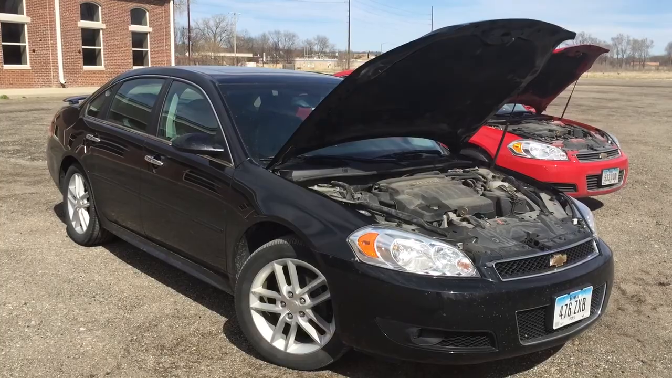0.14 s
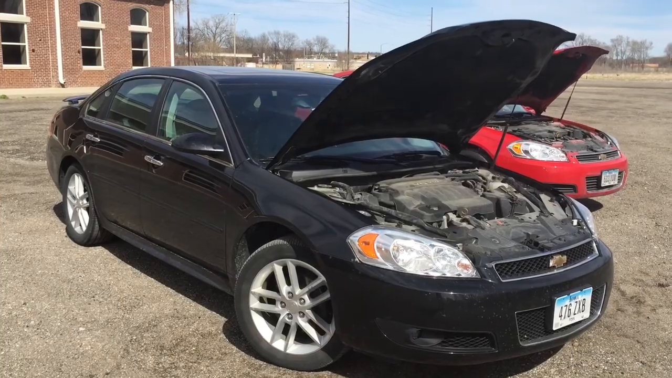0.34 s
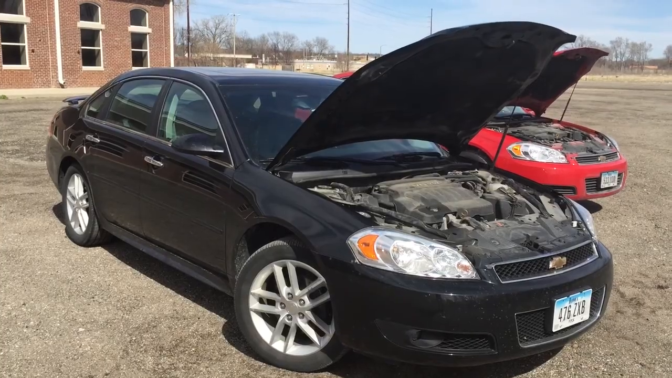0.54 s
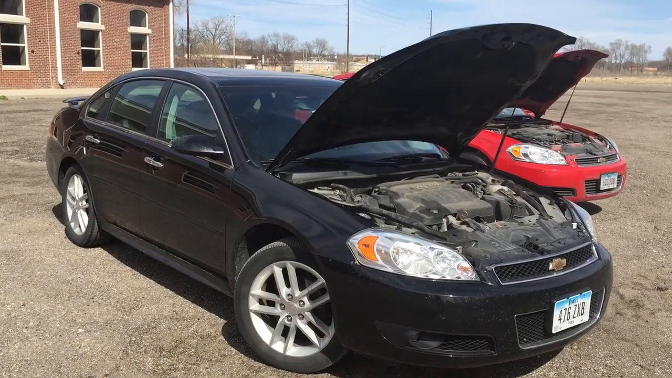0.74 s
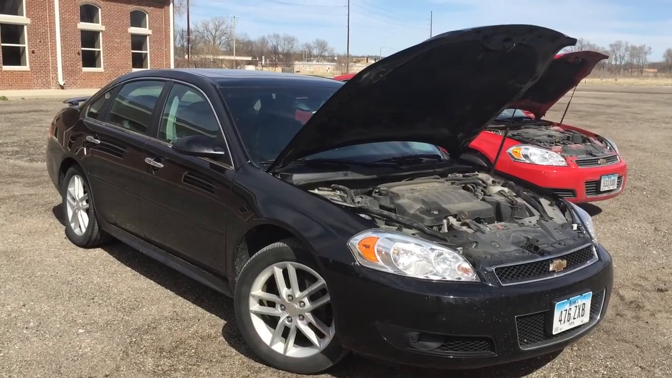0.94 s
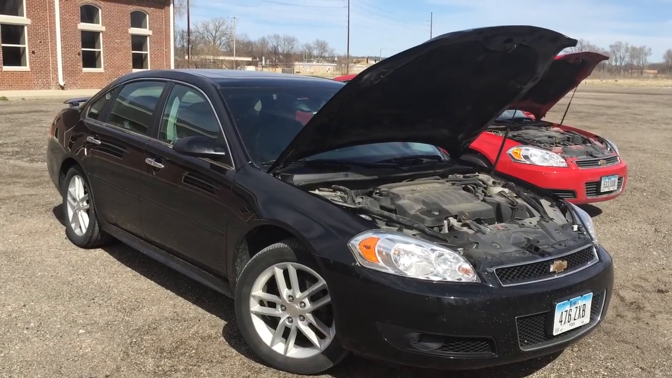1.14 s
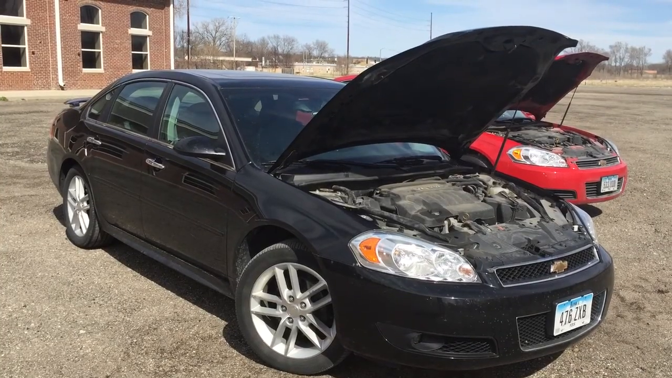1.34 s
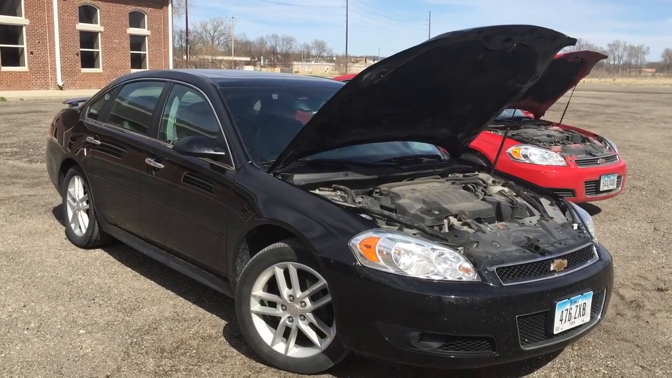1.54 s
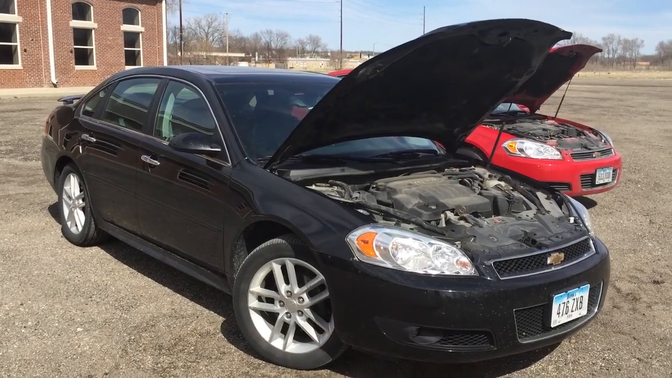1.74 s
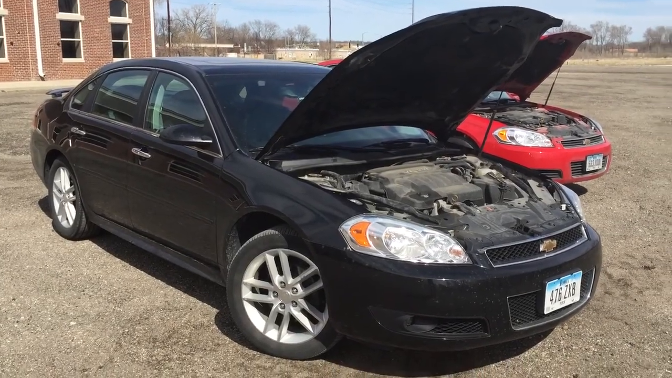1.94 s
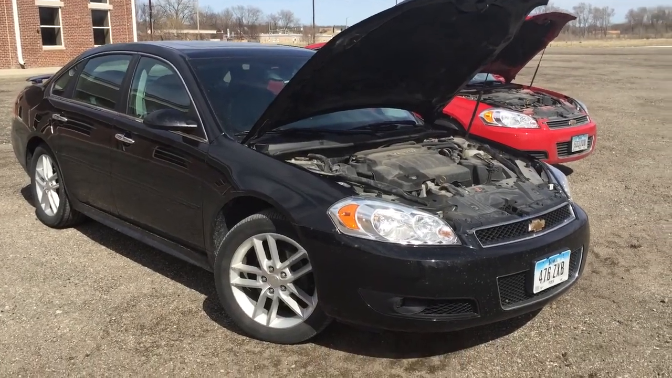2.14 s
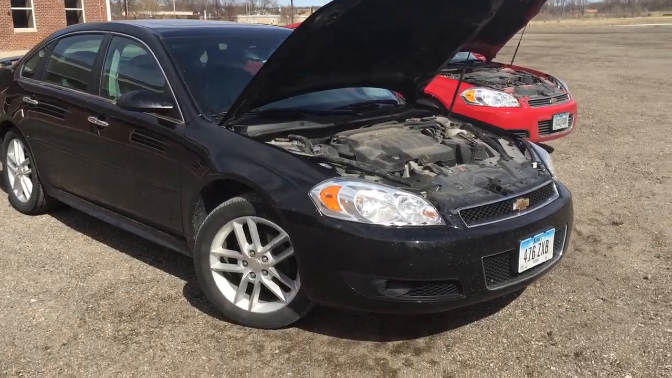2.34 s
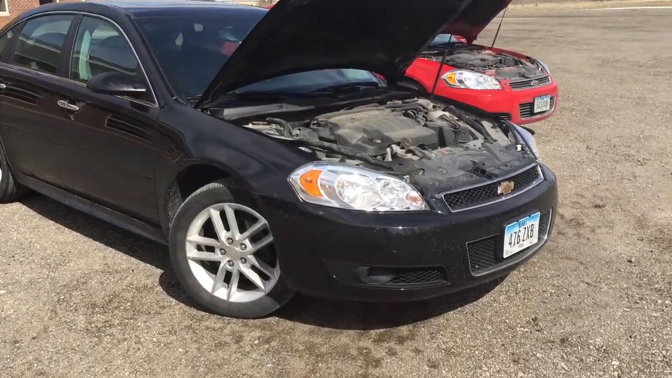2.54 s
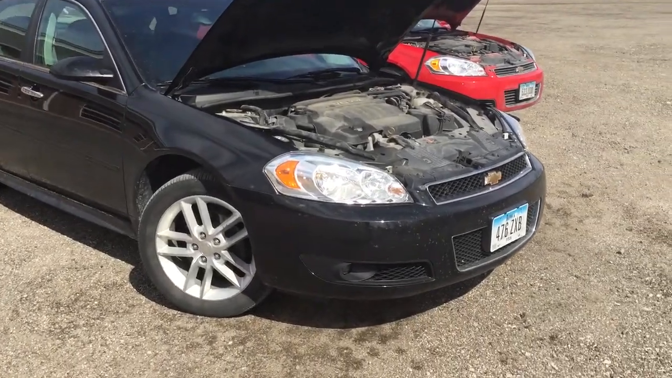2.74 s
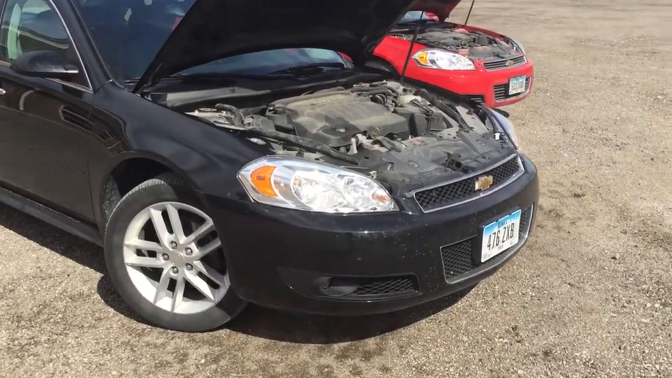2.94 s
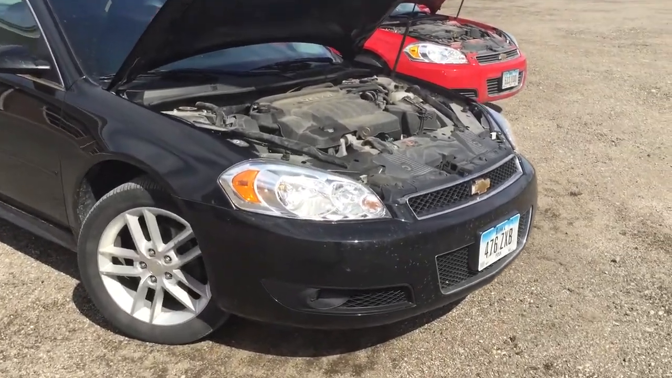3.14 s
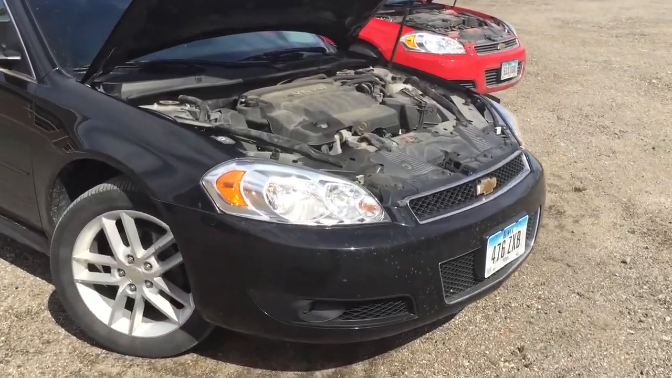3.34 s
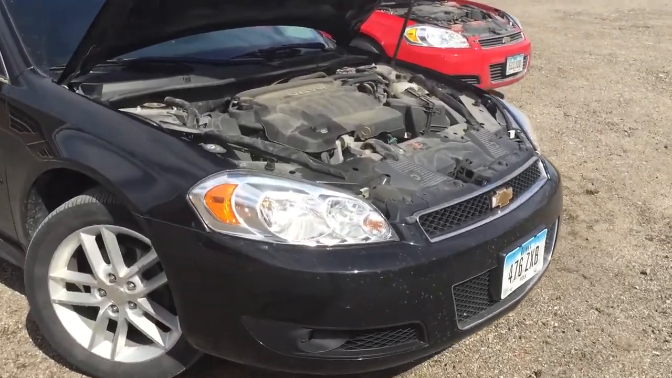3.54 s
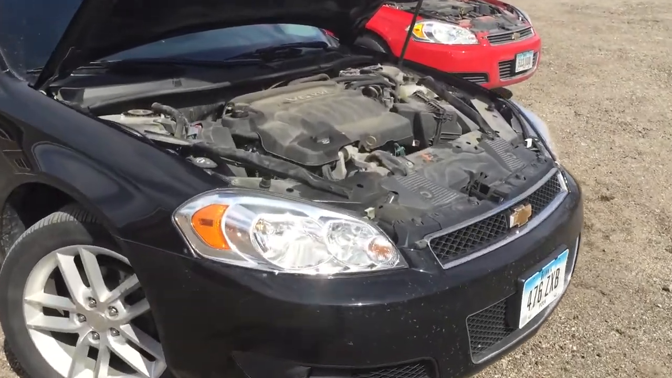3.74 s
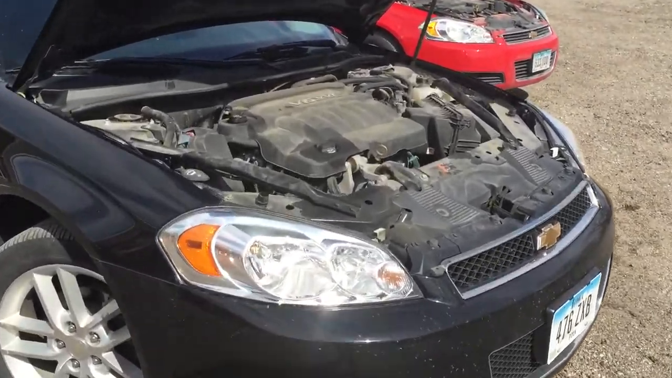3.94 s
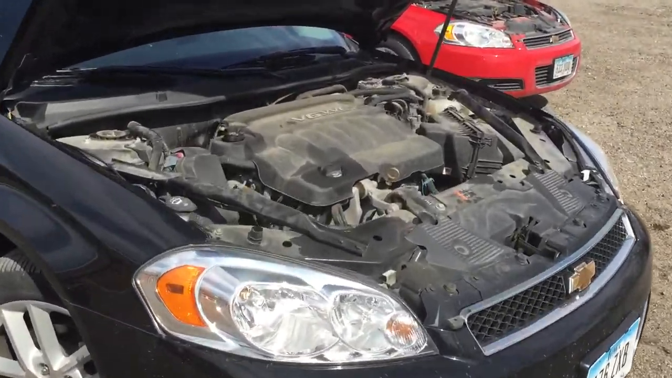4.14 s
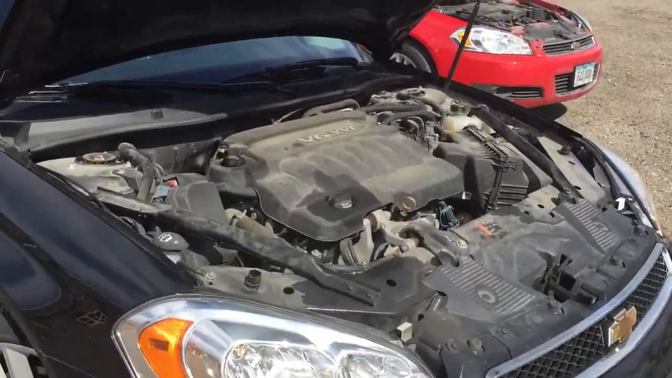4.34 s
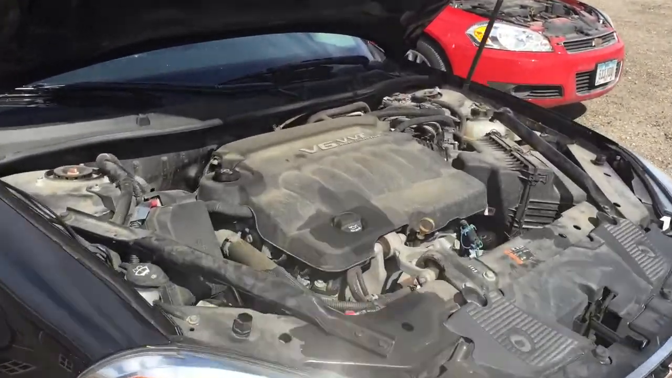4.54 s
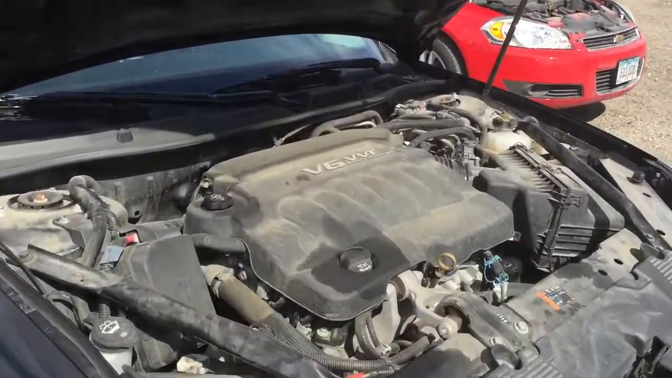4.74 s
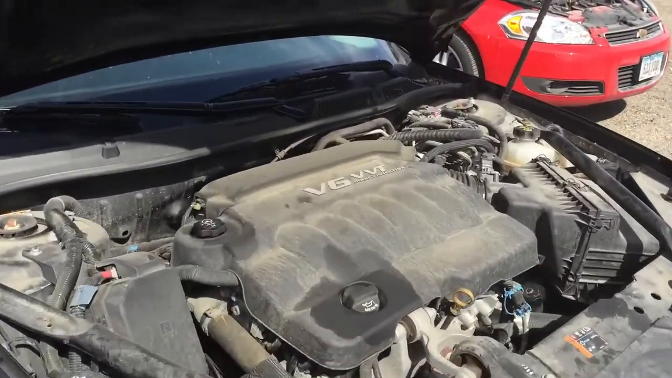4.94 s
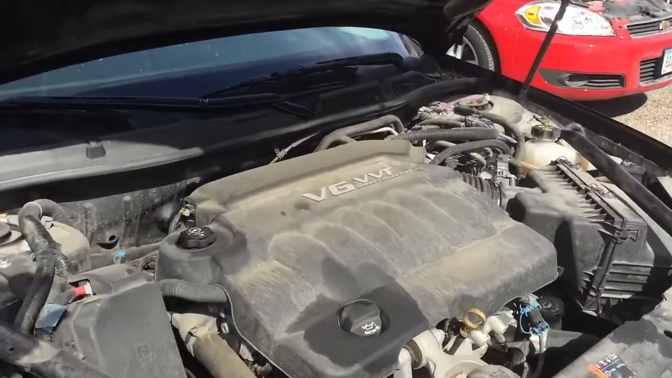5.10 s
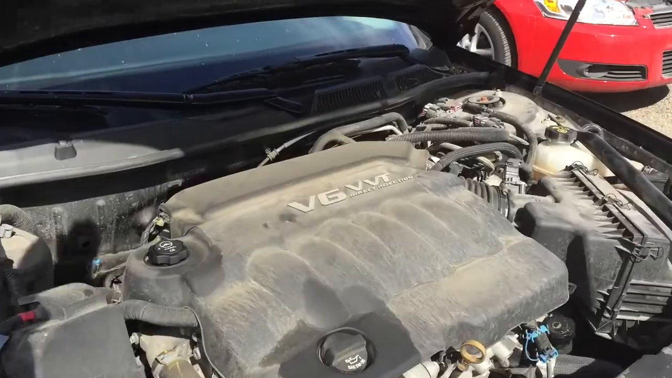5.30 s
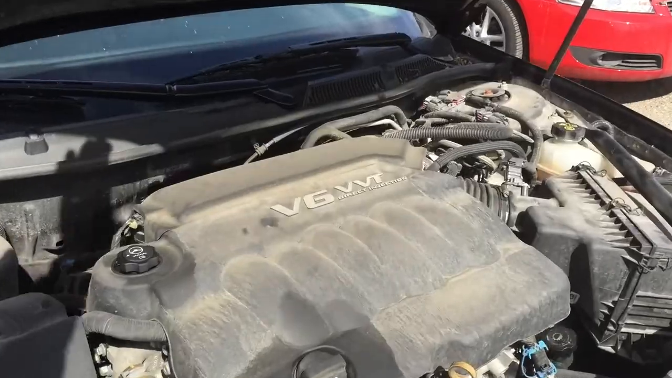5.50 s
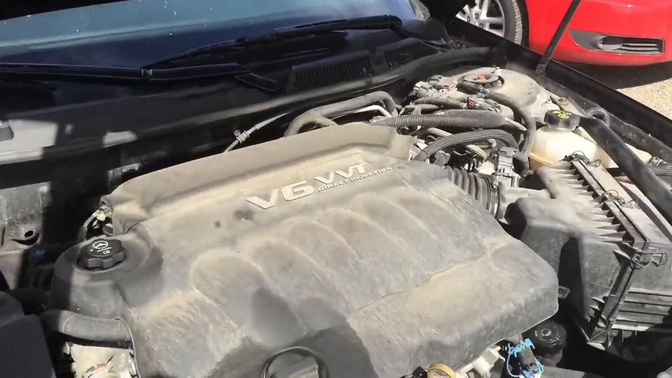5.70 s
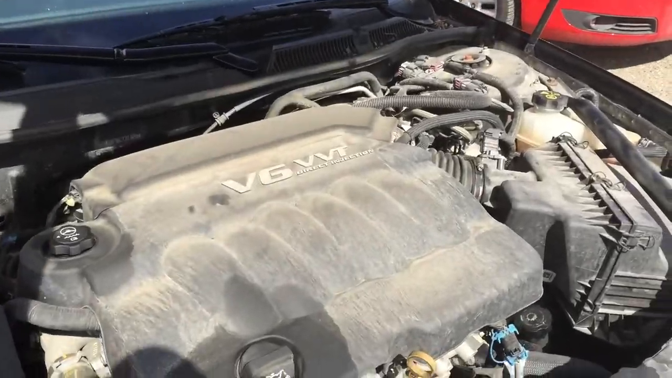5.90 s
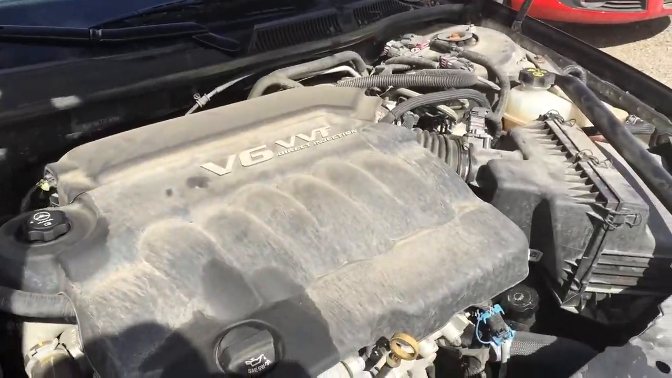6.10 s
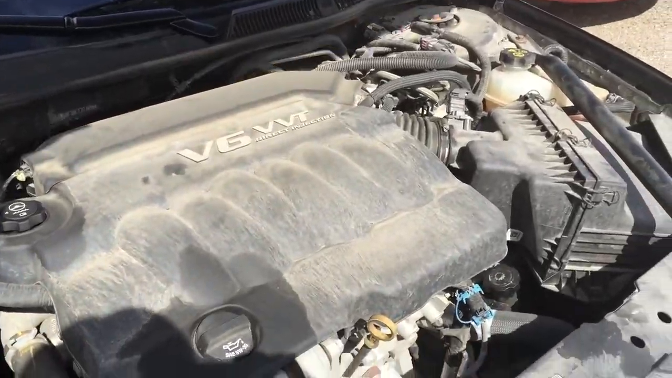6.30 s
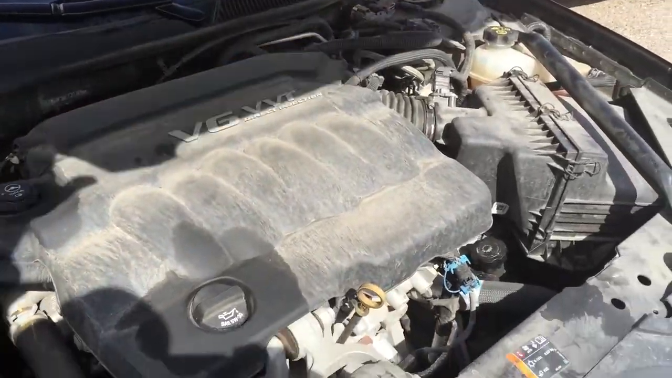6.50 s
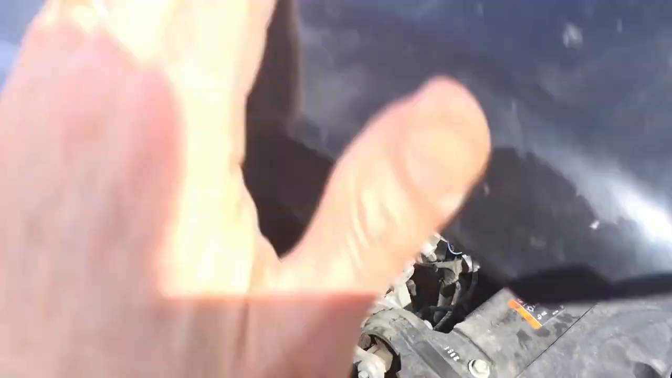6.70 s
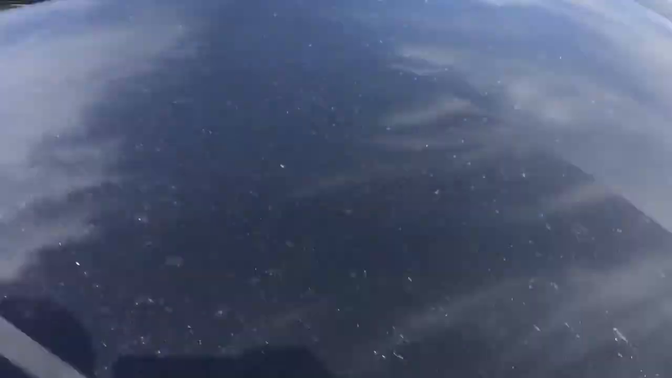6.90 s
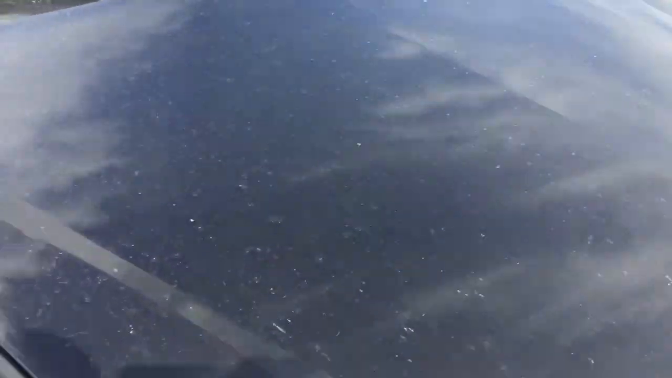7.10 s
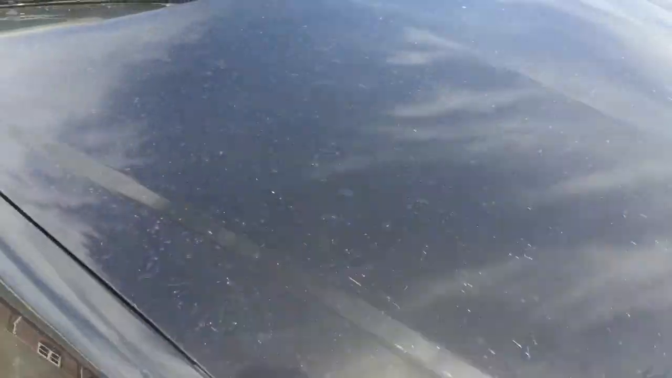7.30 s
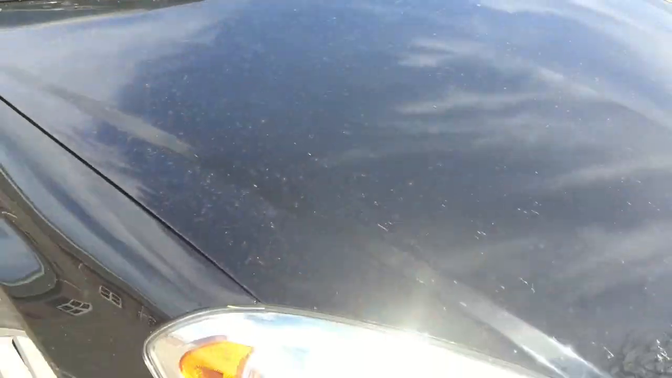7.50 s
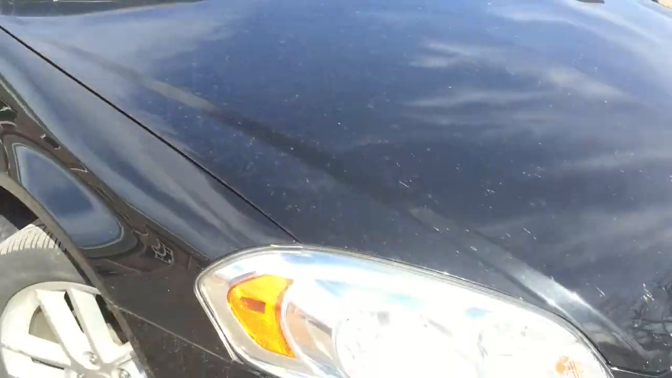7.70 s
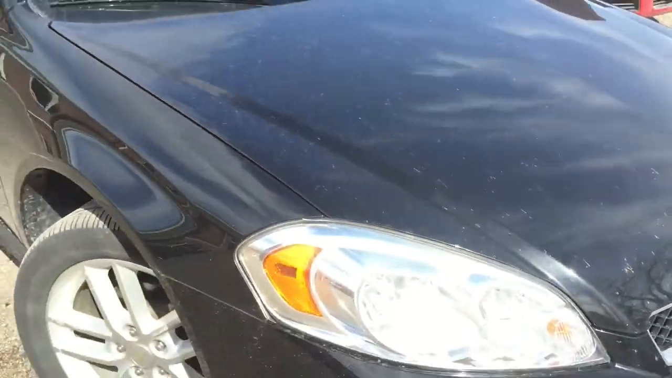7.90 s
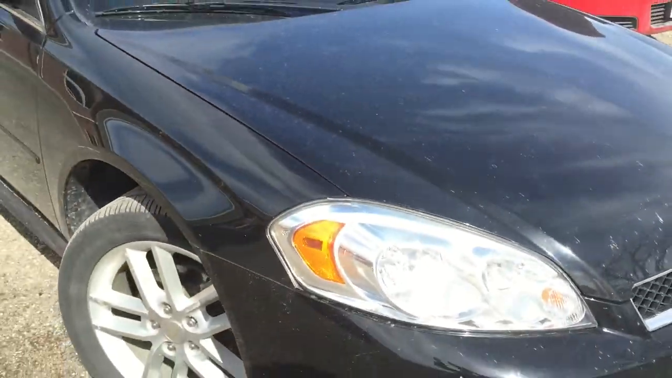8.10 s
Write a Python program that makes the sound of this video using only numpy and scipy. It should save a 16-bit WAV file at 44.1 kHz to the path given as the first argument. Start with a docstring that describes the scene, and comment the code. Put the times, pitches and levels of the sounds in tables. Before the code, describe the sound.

Outdoors, a car idles with its hood open, giving a softly pulsing hiss of belts and valves. It grows louder and brighter as a hand-held microphone approaches. Wind rumbles on the microphone, a low hum comes and goes, and a few small taps sound nearby. Late on, the latch clacks, and a second later the hood slams with a loud metallic crash, leaving the engine muffled under the gusts.

```python
"""A gusty lot, a hand-held microphone walking up to a car that idles with its hood open.
The belts and valve gear hiss through the engine bay, louder and brighter close up. Wind buffets
the microphone, a low hum comes and goes, and a few small taps sound close by. The latch clacks,
then the hood is slammed: its sheet metal crashes, overloads the recorder, echoes off a nearby
building and muffles the engine."""
import sys
import numpy as np
from scipy import signal
from scipy.io import wavfile
from scipy.ndimage import uniform_filter1d

SR = 44100
rng = np.random.default_rng(int(sys.argv[2]) if len(sys.argv) > 2 else 0)


def generate_wav(signal):
    """Clip the signal to [-1, 1] and save it as 16-bit WAV at the path in sys.argv[1]."""
    frames = np.transpose(np.atleast_2d(signal))
    scaled = np.clip(frames, -1, 1) * 32767
    pcm = np.round(scaled).astype(np.int16)
    wavfile.write(sys.argv[1], SR, pcm)


N = 359415


def amp(db):
    return 10 ** (np.asarray(db) / 20)


def unit_rms(x):
    return x / np.sqrt(np.mean(x ** 2) + 1e-20)


def at_hz(points, hz):
    """A curve of (freq_hz, value) points, read along a log frequency axis."""
    freq_hz, value = np.transpose(points)
    return np.interp(np.log(hz + 1), np.log(freq_hz + 1), value)


def follow(curves, t):
    """The columns of a list of (time_s, ...) curves at the times t."""
    time_s, *columns = np.concatenate(curves).T
    return [np.interp(t, time_s, column) for column in columns]


def add(mix, start_s, sound):
    part = mix[round(start_s * SR):][:len(sound)]
    part += sound[:len(part)]


def bandpass(x, band_hz):
    return signal.lfilter(*signal.butter(2, band_hz, "band", fs=SR), x)


def grid(size):
    """Bin frequencies and frame times of short-time spectra at 75% overlap."""
    return np.fft.rfftfreq(size, 1 / SR)[:, None], np.arange(4 * N // size + 5) * size / 4 / SR


def shaped_noise(db, hz, lo_hz, hi_hz):
    """Noise whose spectra follow db (bins x frames), at constant power between lo_hz and hi_hz."""
    gain = amp(db)
    gain = gain / np.sqrt((gain ** 2 * (hz > lo_hz) * (hz < hi_hz)).sum(0))
    real, imag = rng.standard_normal((db.shape[1], len(hz), 2)).T
    size = 2 * len(hz) - 2
    return signal.istft((real + 1j * imag) * gain, nperseg=size, noverlap=3 * size // 4)[1][:N]


# The walk up to the car: time_s, level_db, nearness (0 far or shut and dull, 1 close and bright)
ENGINE_APPROACH = [
    [(0, -42, 0.045), (2.8, -41.5, 0.22), (3.4, -40.5, 0.45), (4.5, -36, 0.55), (5.4, -32, 0.84),
     (5.7, -34, 0.88), (5.9, -32, 0.8), (6.1, -33, 0.76), (6.4, -31.5, 0.67), (6.73, -31.5, 0.82),
     (6.93, -40.5, .3), (7.02, -43.5, 0.26), (7.25, -56, .1), (7.45, -54.5, 0.086), (7.8, -50, 0.3),
     (8.15, -42.5, .27)],
]
# The engine's spectrum from across the lot and from over the open bay: freq_hz, density_db
FAR_SPECTRUM = [(210, -43), (350, -13), (488, -9.5), (628, -1.5), (747, -11), (875, -9.5), (1010, -13),
                (1720, -2.5), (2400, -7), (2900, -2), (3800, -14.5), (4310, -18), (6200, -44),
                (15200, -46.5)]
NEAR_SPECTRUM = [(210, -33.5), (350, -8), (423, -25), (553, -8.5), (735, -13.5), (1000, -9), (1320, -13.5),
                 (1650, -6.5), (2050, -7), (2350, -3), (2750, -0.5), (3150, -4), (3680, -18.5),
                 (4380, -14.5), (4890, -23), (15200, -57.5)]
# Bay resonances and dips, then narrow belt and pump whines: freq_hz, width_hz, lift_db (at nearness 0)
BAY_RESONANCES = [(570, 310, 0), (876, 22, 6.5), (1370, 28, 5.5), (1742, 100, 2), (1920, 60, 5),
                  (2253, 76, 5), (2680, 70, 1), (3010, 180, -0.5), (4250, 110, 7), (4880, 160, -6.5),
                  (5330, 180, 6), (5880, 150, 9), (6500, 570, 10.5), (10300, 310, -5), (14000, 1200, 4.5)]
BELT_WHINES = [(670, 8.3, -3.5), (1290, 16, 4), (1679, 18, 4.5), (1796, 33, 2), (1871, 24, 0),
               (2585, 23, 6), (4210, 36, 5.5)]
VALVE_CYCLE_HZ = 17.2


def engine():
    """Hiss of belts and valve gear through the bay resonances, pulsing with the valve train."""
    hz, frame_s = grid(size=1024)
    _, near = follow(ENGINE_APPROACH, frame_s)
    lift_db = sum(db / (1 + (2 * (hz - centre) / width) ** 2)
                  for centre, width, db in BAY_RESONANCES + BELT_WHINES)
    lift_db = lift_db * (1 - 0.78 * near)  # close up, many sources blur the resonances
    patches = rng.standard_normal((len(frame_s), len(hz))).T
    patches = uniform_filter1d(uniform_filter1d(patches, size=5, axis=0), size=12, axis=1)
    flicker_db = 1.5 * unit_rms(patches)
    spectrum_db = (1 - near) * at_hz(FAR_SPECTRUM, hz) + near * at_hz(NEAR_SPECTRUM, hz)
    hiss = shaped_noise(spectrum_db + lift_db + flicker_db, hz, lo_hz=1200, hi_hz=4000)
    t = np.arange(N) / SR
    wander = unit_rms(uniform_filter1d(rng.standard_normal(N), size=8000))
    phase = (VALVE_CYCLE_HZ * t + 0.055 * wander) % 1
    strong_valve = 0.5 * np.exp(-phase / 0.38)
    six_cylinders = 0.18 * np.exp(-(6 * phase % 1) / 0.3)
    pulse = uniform_filter1d(uniform_filter1d(1.3 + strong_valve + six_cylinders, size=60), size=60)
    level_db, _ = follow(ENGINE_APPROACH, t)
    return amp(level_db) * hiss * unit_rms(pulse)


# Gusts across the microphone port: start_s, length_s, level_db, change_db, pitch_hz, gap_ms
GUST_TRAINS = [(0.418, 0.17, -36, 6, 102, 43), (3.03, .12, -27, -8, 95, 25.4),
               (5.148, 0.058, -28, 0, 87.5, 24), (5.516, 0.19, -10.5, -7, 124.6, 21.6),
               (5.96, .05, -14, 0, 127, 16), (6.065, 0.067, -27, 0, 142, 19),
               (6.336, 0.258, -25, -4, 120, 28), (7.446, .1, -25.5, 2, 125, 35),
               (7.76, .075, -13.5, -4.5, 110, 15.8), (7.9, 0.28, -25.5, 5.5, 159, 37)]
EDDY_TURNS = 1.5  # typical swings in one eddy
GAP_SPREAD, PITCH_SPREAD, TURNS_SPREAD, SIZE_SPREAD_DB = 0.3, 0.25, 0.34, 1
SAG_PER_DB = 0.04  # a fading gust sheds slower eddies


def gust_eddies(start_s, length_s, level_db, change_db, pitch_hz, gap_ms):
    """The eddies one gust sheds: uneven gaps, sizes and pitches, pushing or pulling first."""
    gap, pitch, turns, size, push = np.clip(rng.standard_normal((16, 5)), -2, 2).T
    since_s = np.cumsum(gap_ms / 1000 * np.exp(GAP_SPREAD * gap))
    since_s = since_s - since_s[0]
    progress = since_s / length_s
    hz = pitch_hz * np.exp(PITCH_SPREAD * pitch + SAG_PER_DB * change_db * np.minimum(progress, 1))
    db = level_db + change_db * progress + SIZE_SPREAD_DB * size
    width_ms = 1000 * EDDY_TURNS * np.exp(TURNS_SPREAD * turns) / hz
    rows = np.transpose([start_s + since_s, db, hz, width_ms, np.sign(push)])
    return list(rows[since_s < length_s])


# Wind right on the microphone: time_s, level_db, tilt_db_per_octave
WIND_STRENGTH = [
    [(0, -42.5, -4.5), (.23, -45.5, -4), (.92, -48.5, -3), (1.27, -48.5, 0), (1.68, -43.5, -6),
     (1.88, -48, -5), (2.29, -50, -0.5), (2.77, -49.5, -4.5), (2.93, -41.5, -4), (3.25, -51.5, -1),
     (3.62, -45.5, -3.5), (3.72, -49, -1.5), (4.91, -49, 1), (5.55, -39, -3), (5.77, -44, -2.5),
     (6.08, -39.5, -4.5), (6.47, -40.5, 0), (6.82, -49, 2.5), (6.92, -34.5, -2.5), (7.02, -43.5, 3.5),
     (7.38, -37.5, 4.5), (7.51, -34, 2.5), (7.69, -34, 1.5), (7.79, -30, 2.5), (8.15, -30.5, 1)],
]
# Its buffeting before the tilt: freq_hz, density_db
BUFFET_SPECTRUM = [(12, -44), (20, -16), (50, 5), (107, 1), (173, -4.5), (224, -7), (305, -11.5),
                   (476, -27.5), (809, -34), (1200, -45), (1560, -70.5), (2640, -120)]
# Lone eddies bursting on the port: centre_s, level_db, pitch_hz, width_ms
LONE_EDDIES = [(.04, -26.5, 100, 6.6), (.816, -31, 83, 15), (.982, -43, 75, 27), (1.036, -38.5, 102, 28),
               (1.21, -34, 129, 9.7), (1.757, -25.5, 97, 10), (3.003, -20, 80, 18), (3.48, -35, 100, 3.6),
               (3.632, -26.5, 101, 15), (3.695, -34, 82, 28), (4.164, -37, 94, 17), (5.026, -34, 81, 28),
               (5.315, -26.5, 118, 14), (5.8, -31, 79.5, 22), (5.904, -25, 82, 28),
               (6.207, -24.5, 187, 8.8), (6.805, -31.5, 84, 30), (6.905, -32, 102, 7),
               (6.973, -23.5, 103, 26), (7.298, -25.5, 170, 15), (7.359, -21, 139, 18),
               (7.427, -19.5, 174, 8.2), (7.87, -22, 121, 9), (7.566, -20, 233, 6.5), (7.715, -20, 137, 11),
               (7.74, -12, 131, 3.9)]


def wind():
    """Lumpy low turbulence on the microphone, plus single eddies as short pressure swings."""
    hz, frame_s = grid(size=2048)
    _, tilt_db = follow(WIND_STRENGTH, frame_s)
    octaves = np.log2(np.clip(hz, 20, 1500) / 125)
    rumble = shaped_noise(at_hz(BUFFET_SPECTRUM, hz) + tilt_db * octaves, hz, lo_hz=100, hi_hz=150)
    lumps = unit_rms(uniform_filter1d(uniform_filter1d(rng.standard_normal(N), size=500), size=500))
    level_db, _ = follow(WIND_STRENGTH, np.arange(N) / SR)
    out = amp(level_db) * rumble * unit_rms(amp(2.74 * lumps))
    eddies = [(*eddy, 1) for eddy in LONE_EDDIES]
    eddies += [eddy for gust in GUST_TRAINS for eddy in gust_eddies(*gust)]
    for centre_s, db, pitch_hz, width_ms, sign in eddies:
        t = np.arange(-1.6 * width_ms / 1000, 1.6 * width_ms / 1000, 1 / SR)
        passage = 2 * t / (width_ms / 1000)
        envelope = 2. ** -(passage ** 2)
        turns = pitch_hz * t * (1 - 0.13 * passage)  # the swing slows as it passes
        swing = sum(gain * np.sin(2 * np.pi * multiple * turns)
                    for multiple, gain in [(0.5, 0.28), (1, 1), (2, 0.23), (3, 0.076)])
        local_rumble = rumble[round((centre_s + t[0]) * SR):][:len(t)]
        torn_air = 0.044 * np.resize(local_rumble, len(t)) / rumble.std() * envelope
        add(out, centre_s + t[0], sign * amp(db) * (swing + torn_air) * envelope)
    return out


# Spells of low hum on the way to the car: start_s, end_s, pitch_hz, start_db, end_db
HUM_SPELLS = [(.15, 1.183, 83.65, -42.5, -53), (1.19, 1.781, 84.1, -46.5, -31.5),
              (1.85, 2.932, 83.54, -35.5, -37), (3.77, 4.755, 81.5, -38, -42.5),
              (4.76, 4.964, 82.1, -43, -37)]
# The hum's partials: multiple, gain_db
HUM_PARTIALS = [(1, 1.5), (2, -16.5), (4, -30)]
HUM_FADE_S, HUM_SAG_HZ_PER_S = 0.048, 0.29


def hum():
    """A low tone with weak overtones that comes in spells, sagging a little in pitch."""
    out = np.zeros(N)
    for start_s, end_s, pitch_hz, start_db, end_db in HUM_SPELLS:
        t = np.arange(0, end_s - start_s, 1 / SR)
        turns = np.cumsum(pitch_hz - HUM_SAG_HZ_PER_S * (t - t.mean())) / SR
        tone = sum(amp(db) * np.cos(2 * np.pi * multiple * turns) for multiple, db in HUM_PARTIALS)
        fade = np.minimum(np.minimum(t, t[::-1]) / HUM_FADE_S, 1)
        level_db = start_db + (end_db - start_db) * t / t[-1]
        add(out, start_s, np.sqrt(2) * amp(level_db) * tone * fade)
    return out


# Small taps close to the microphone: start_s, level_db, pitch_hz, t60_s, rustle_db
CLOSE_TAPS = [(2.215, -33, 1740, .014, -41), (3.484, -24, 704, 0.016, -40), (5.148, -30, 1000, 0.016, -35),
              (8.013, -34, 1700, 0.017, -38)]
RUSTLE_BAND_HZ, RUSTLE_T60_S = (700, 3000), 0.15


def taps():
    """Short dull taps that drop at once onto their pitch, each with a brief rustle."""
    out, t = np.zeros(N), np.arange(2000) / SR
    attack = 1 - np.exp(-(t / 0.00033) ** 2)
    for start_s, level_db, pitch_hz, t60_s, rustle_db in CLOSE_TAPS:
        turns = pitch_hz * (t + 0.001 * (1 - np.exp(-t / 0.00066)))
        tap = amp(level_db - 60 * t / t60_s) * np.sin(2 * np.pi * turns)
        hiss = bandpass(bandpass(rng.standard_normal(len(t)), RUSTLE_BAND_HZ), RUSTLE_BAND_HZ)
        rustle = amp(rustle_db - 60 * t / RUSTLE_T60_S) * unit_rms(hiss)
        add(out, start_s, (tap + rustle) * attack)
    return out


def struck_metal(modes, tilt_db, damping):
    """Decaying modes, peak 1; each blow lands elsewhere, and a hard one favours the high modes."""
    hz, db, t60_s = np.transpose(modes)[:, :, None]
    t = np.arange(SR // 3) / SR
    share, detune = rng.standard_normal((2, *hz.shape))
    gain = amp(db + tilt_db * np.log2(hz / 1500) + 2.7 * share - 60 * t * damping / t60_s)
    attack = 1 - np.exp(-(t / 0.00026) ** 2)
    ring = (gain * np.sin(2 * np.pi * hz * (1 + 0.0049 * detune) * t)).sum(0) * attack
    return ring / abs(ring).max()


# The latch's modes, heard from beside the car: pitch_hz, level_db, t60_s (before damping)
LATCH_MODES = [(850, -6.5, 0.18), (1217, -11.5, 0.065), (1324, 0.5, 0.088), (1436, -8.5, 0.065),
               (1604, 3.5, 0.039), (1730, -10, 0.057), (1996, -16.5, 0.04), (2490, -9, 0.091),
               (2586, 6.5, 0.073), (2750, -1.5, 0.14), (2906, -1.5, 0.054), (3240, -17.5, 0.049),
               (3590, -6.5, 0.086), (3820, -20.5, .04), (4540, -22.5, .04), (4660, -15.5, 0.061),
               (5120, -18, 0.04), (5550, -23, 0.069), (6050, -31.5, 0.049)]
# Strikes on the latch: start_s, level_db, chatter_ms, step_db (per bounce)
LATCH_STRIKES = [(6.0516, -7, 10, -9.5), (7.039, 0.5, 18, -6.5)]
CHATTER_GAP_S, CHATTER_STEP_DB, BOUNCE_GAP_GROWTH = 0.0041, -0.1, 1.75
CONTACT_DB, CONTACT_DECAY_S = -21.5, 0.002  # level relative to the strike


def latch():
    """Each strike gives a bright first contact, quick chatter, then four ever slower, softer bounces."""
    out = np.zeros(N)
    contact_decay = np.exp(-np.arange(600) / SR / CONTACT_DECAY_S)
    for start_s, level_db, chatter_ms, step_db in LATCH_STRIKES:
        contact = bandpass(rng.standard_normal(600), band_hz=(2500, 7000)) * contact_decay
        add(out, start_s, amp(level_db + CONTACT_DB) * contact)
        knock = np.arange(int(chatter_ms / 1000 / CHATTER_GAP_S) + 5)
        bounce = np.maximum(knock - knock[-5], 0)
        times_s = start_s - CHATTER_GAP_S + np.cumsum(CHATTER_GAP_S * BOUNCE_GAP_GROWTH ** bounce)
        levels_db = level_db + CHATTER_STEP_DB * knock + step_db * bounce
        for time_s, db in zip(times_s, levels_db):
            add(out, time_s, amp(db) * struck_metal(LATCH_MODES, tilt_db=1.4, damping=1.64))
    return out


# The hood's dense sheet-metal modes at close range: freq_hz, density_db
CRASH_SPECTRUM = [(59, -31.5), (100, -1.5), (640, -10.5), (727, -8.5), (1340, -17.5), (1520, -10),
                  (1660, -20), (2690, -18.5), (3460, -23), (6810, -35), (15500, -50)]
# How long they ring: freq_hz, t60_s
CRASH_DECAY = [(150, 0.24), (500, 0.19), (1500, 0.16), (4000, 0.15), (10000, 0.064)]
SLAM_S, CRASH_DB = 7.039, -6


def hood_crash():
    """The slam sets the whole sheet of metal crashing, and it dies away band by band."""
    hz, frame_s = grid(size=256)
    since_s = np.clip(frame_s - SLAM_S, 0, None)
    free_s = np.clip(since_s - 0.025, 0, None)  # the rattle feeds the crash for a moment
    dying_db = 60 * free_s / at_hz(CRASH_DECAY, hz)
    spreading_db = 20 * np.exp(-(since_s / 0.034) ** 2) * (hz < 700)  # bass needs time to spread
    spectra = (rng.standard_normal((len(frame_s), len(hz), 2)) @ [1, 1j]).T
    spectra = spectra * amp(at_hz(CRASH_SPECTRUM, hz) - dying_db - spreading_db)
    crash = signal.istft(spectra, nperseg=256, noverlap=192)[1][round(SLAM_S * SR):N]
    attack = np.minimum(np.arange(len(crash)) / (0.0026 * SR), 1)
    out = np.zeros(N)
    add(out, SLAM_S, amp(CRASH_DB) * crash / crash[:1000].std() * attack)
    return out


# The hood panel's modes at close range: pitch_hz, level_db, t60_s (before damping)
HOOD_MODES = [(142, -4, 0.26), (199, -6, 0.18), (256, -11, 0.11), (306, 4, 0.15), (361, -6.5, 0.33),
              (406, -7, 0.27), (486, -13, 0.22), (540, -8.5, .18), (710, -3.5, 0.19), (733, 0, 0.21),
              (825, -6.5, .16), (930, -4, 0.21), (1174, -10, .15), (1363, -6, 0.2), (1460, -8.5, .15),
              (1624, -7, 0.19), (1716, -4, .14), (2250, -12, 0.16), (2610, -7, 0.17), (3020, -9, 0.21),
              (3050, -15.5, 0.11)]
# Its blows on the stops: start_s, peak_db, hardness_db_per_octave
HOOD_BLOWS = [(7.047, -1.5, 1.5), (7.058, 3, -1), (7.066, 5, -0.5), (7.079, -7, -1.5), (7.088, -11, 3.5)]
THUMP_S, THUMP_HZ, THUMP_T60_S = 7.057, 78, 0.22


def hood_landing():
    """The hood rings as it bounces on its stops, and thumps as it flexes on the trapped air."""
    out = np.zeros(N)
    for start_s, peak_db, hardness in HOOD_BLOWS:
        add(out, start_s, amp(peak_db) * struck_metal(HOOD_MODES, tilt_db=hardness, damping=1.9))
    t = np.arange(SR // 2) / SR
    envelope = amp(-60 * t / THUMP_T60_S) * (1 - np.exp(-t / 0.0018))
    add(out, THUMP_S, -envelope * np.sin(2 * np.pi * THUMP_HZ * t))
    return out


def wall_echo(sound, delay_s=0.11, gain_db=-44):
    """A nearby building returns a faint, thin echo to the microphone."""
    out = np.zeros(N)
    add(out, delay_s, amp(gain_db) * bandpass(sound, band_hz=(1500, 5000)))
    return out


def scene():
    """Everything that reaches the one microphone."""
    lot = engine() + wind() + hum()
    impacts = latch() + hood_landing() + hood_crash()
    return (lot + taps() + impacts + wall_echo(impacts))[None]


LOW_CUT_HZ, TOP_HZ, CEILING, KNEE = 40, 15750, 0.7, 6.1


def record(dry):
    """The microphone loses the deepest bass, the input overloads with a firm knee, the top is cut."""
    mic = signal.lfilter(*signal.butter(2, LOW_CUT_HZ, "high", fs=SR), dry)
    clipped = mic / (1 + abs(mic / CEILING) ** KNEE) ** (1 / KNEE)
    band_limit = signal.firwin(511, TOP_HZ, window=("kaiser", 9), fs=SR)
    return signal.oaconvolve(clipped, band_limit[None], "same")


dry = scene()
out = record(dry)
generate_wav(out)
```